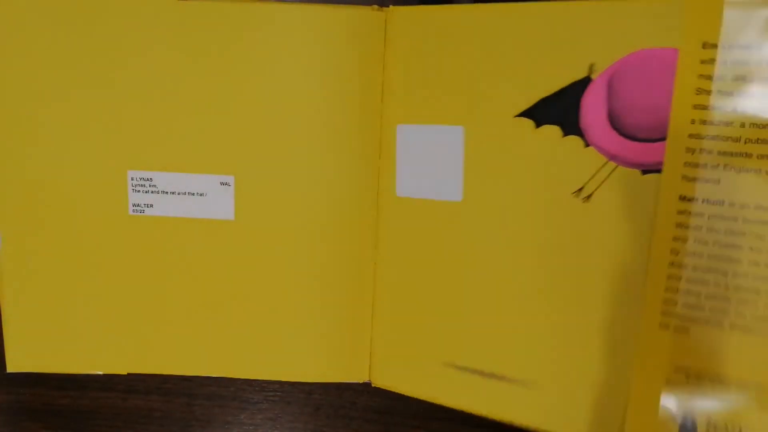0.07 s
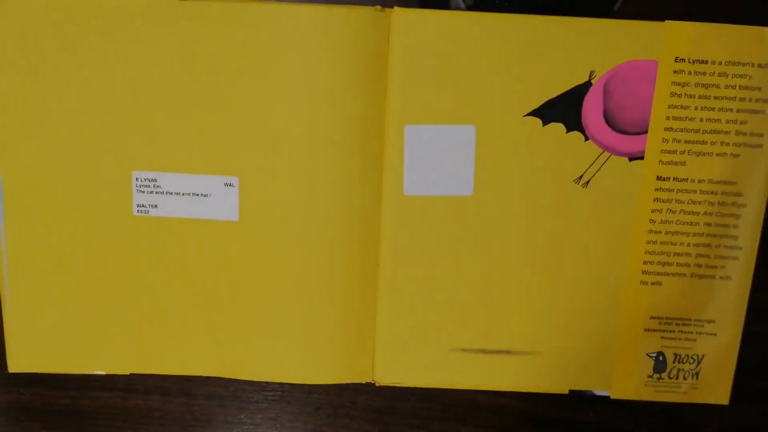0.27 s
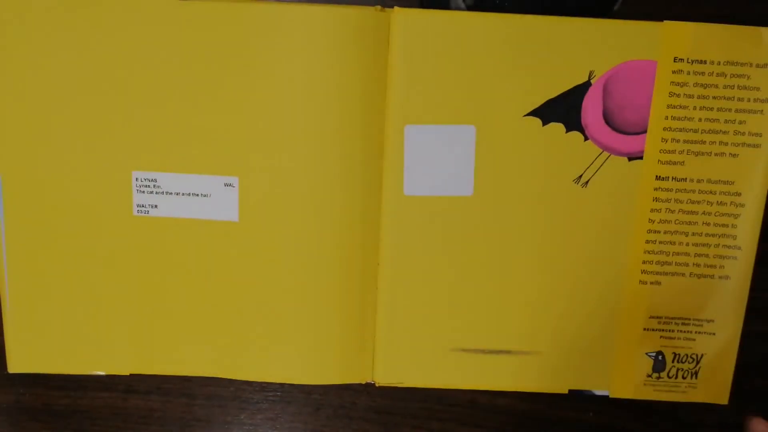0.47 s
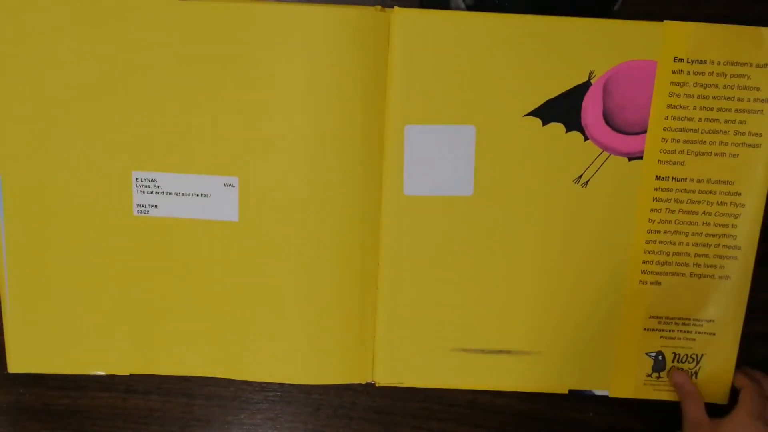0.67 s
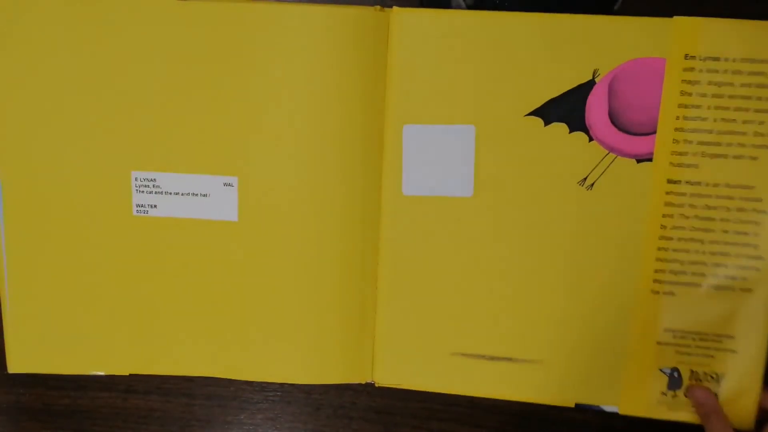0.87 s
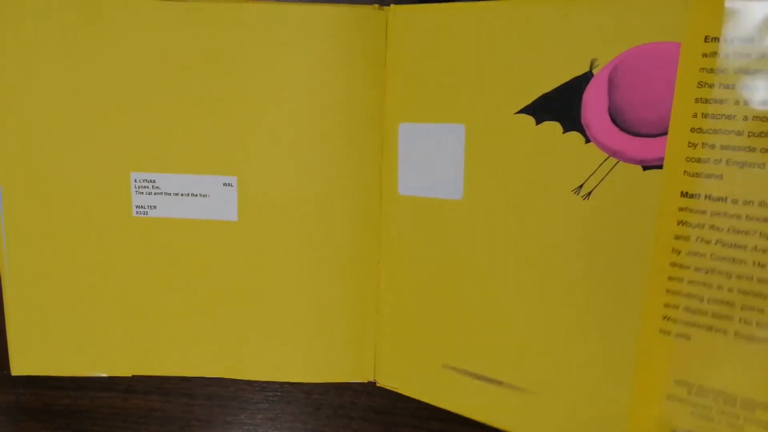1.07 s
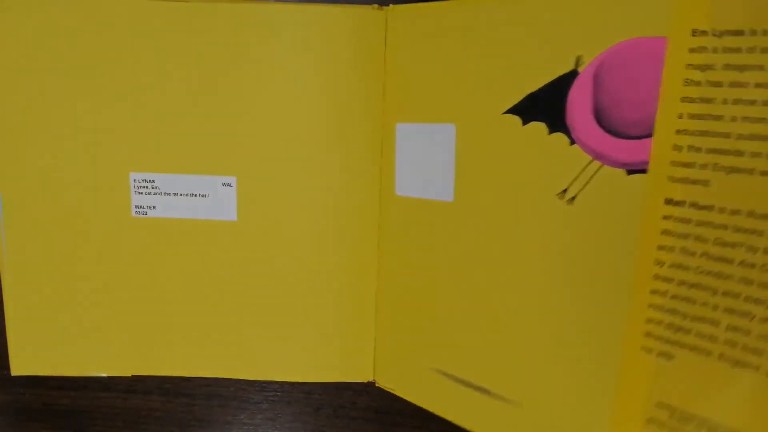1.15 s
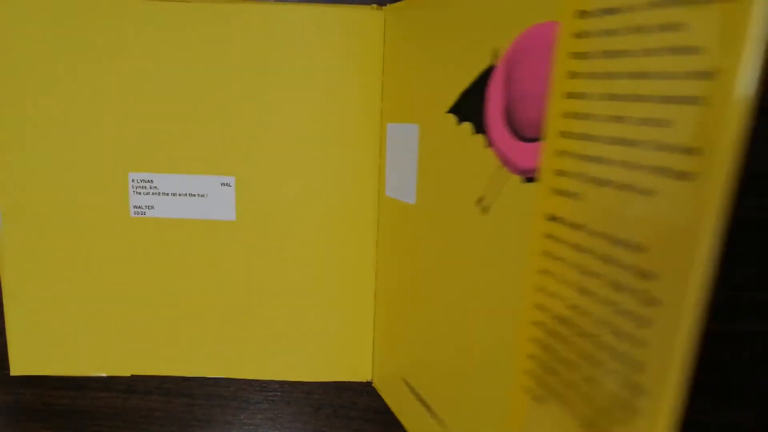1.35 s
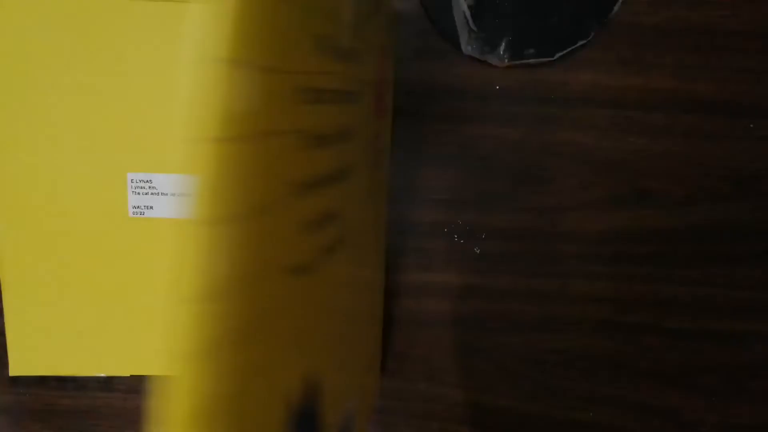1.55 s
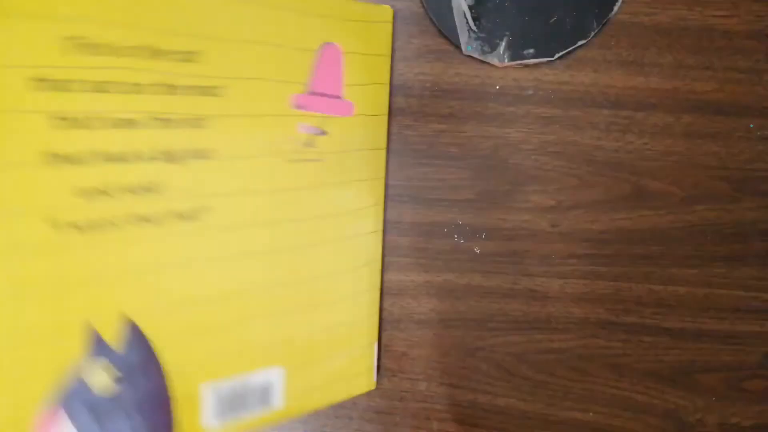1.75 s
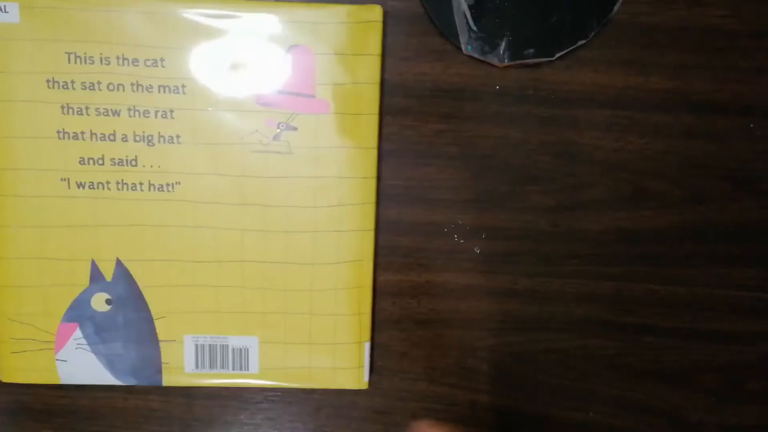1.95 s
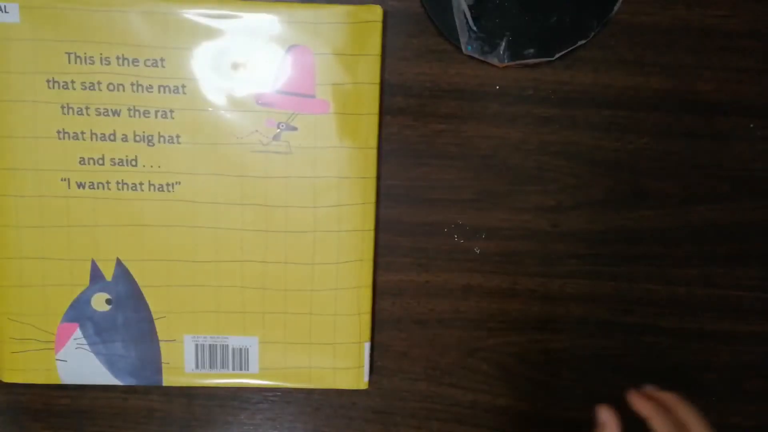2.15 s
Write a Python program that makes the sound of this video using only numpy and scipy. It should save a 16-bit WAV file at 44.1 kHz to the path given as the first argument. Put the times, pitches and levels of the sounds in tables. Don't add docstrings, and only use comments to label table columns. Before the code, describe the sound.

Hardcover book drops open on a wooden table, crackles in its plastic jacket, then thumps shut

```python
import sys
import numpy as np
from scipy import signal
from scipy.fft import rfft, irfft
from scipy.io import wavfile
from scipy.ndimage import uniform_filter1d

SR = 44100
rng = np.random.default_rng(int(sys.argv[2]) if len(sys.argv) > 2 else 0)


def materialize(psi):
    bounded = np.clip(np.atleast_2d(psi).T, -1, 1)
    quanta = np.round(bounded * 32767).astype(np.int16)
    wavfile.write(sys.argv[1], SR, quanta)


def boost_factor(decibels):
    exponent = np.asarray(decibels, float) / 20
    return 10 ** exponent


N = 97020


def evened(x):
    return x / np.sqrt(np.mean(x ** 2) + 1e-20)


def read(points, hz):
    f, value = np.transpose(points)
    return np.interp(np.log(hz + 1), np.log(f + 1), value)


def curve(points):
    return np.interp(np.arange(N) / SR, *np.transpose(points))


def add(mix, start_s, sound):
    part = mix[round(start_s * SR):][:len(sound)]
    part += sound[:len(part)]


def resonate(x, hz, width_hz):
    r = np.exp(-np.pi * width_hz / SR)
    feedback = [1, -2 * r * np.cos(2 * np.pi * hz / SR), r * r]
    return signal.lfilter([(1 - r * r) / 2, 0, (r * r - 1) / 2], feedback, x)


def band(x, lo_hz, hi_hz):
    return signal.sosfilt(signal.butter(2, [lo_hz, hi_hz], "band", fs=SR, output="sos"), x)


def burst(noise, length_ms, rise_ms):
    t_ms = np.arange(len(noise)) * 1e3 / SR
    fall = boost_factor(-20 * (t_ms / np.clip(length_ms, .3, 80)) ** 1.4)
    return noise * np.minimum(t_ms / rise_ms, 1) * fall


# pitch_hz, level_db (per Hz)
HUSH_COLOUR = [(12, -25), (20, -1.5), (113, -15.5), (172, -21), (434, -27.5), (660, -26), (738, -29.5),
               (3070, -44), (16000, -55.5)]
# time_s, level_db
RUMBLE_LEVEL = [(0, -62.5), (.45, -73.5), (.7, -65.5), (1.0, -70.5), (1.1, -75), (1.8, -72), (1.95, -58),
                (2.2, -73.5)]
# pitch_hz, likeness (0 to 1)
LIKENESS = [(30, 0.42), (300, 0.1), (1000, 0.23), (4000, 0.27), (12000, 0.23)]


def room_floor():
    hush_db, rumble_hz = -63, 51
    hz = np.fft.rfftfreq(N, 1 / SR)
    a, b, c = rfft(rng.standard_normal((3, N)))
    same = np.clip(read(LIKENESS, hz), 0, 1)
    both = np.array([a, same * a + np.sqrt(1 - same ** 2) * b])
    hush = irfft(both * boost_factor(read(HUSH_COLOUR, hz)), N)
    hump = (hz / rumble_hz) ** 2 / (1 + (hz / rumble_hz) ** 4.23)
    rumble = irfft(np.array([c + 0.17 * b, c - .25 * b]) * hump, N)
    rumble = boost_factor(curve(RUMBLE_LEVEL)) * evened(rumble) * boost_factor([[.5], [-.5]])
    return boost_factor(hush_db - 7) * evened(hush) + rumble


# time_s, level_db
RUB_LEVEL = [(0, -50.5), (.06, -87.5), (.18, -64), (.3, -53.5), (.45, -60), (.6, -87), (.72, -79),
             (.76, -66.5), (.9, -61), (1.0, -68.5), (1.15, -69.5), (1.25, -75.5), (1.32, -70), (1.6, -75.5),
             (1.8, -71.5), (1.865, -57), (1.89, -50), (2.2, -86)]
# pitch_hz, level_db
PAPER_COLOUR = [(300, -0.5), (700, 7), (1500, 2), (3000, 2.5), (6000, 1.5), (11000, -3.5), (16000, -2.5)]


def rubbing():
    slips_per_s, spread_db = 1200, 3.2
    strength = boost_factor(spread_db * np.minimum(rng.exponential(1, N), 4.5))
    slips = strength * (rng.random(N) < slips_per_s / SR)
    grains = signal.lfilter([1], [1, -.93], slips) * rng.standard_normal(N)
    tone = boost_factor(read(PAPER_COLOUR, np.fft.rfftfreq(N, 1 / SR)))
    return boost_factor(curve(RUB_LEVEL)) * evened(irfft(rfft(grains) * tone, N))


# start_s, peak_db, dull_part_db (relative), length_ms, sharp_top_db (relative)
JACKET_SNAPS = [(0.0173, -38, -14, 5.9, -14), (0.0632, -26, -63, 4.4, 4), (.161, -38.5, -37, 3.7, -14),
                (.189, -37, -9, 6.8, -1), (0.2019, -26.5, -16.5, 7.4, -13.5), (.208, -43.5, -8, 72, 11.5),
                (0.3261, -34, -9.5, 14, 6.5), (0.4224, -31, -12, 7, -21.5), (0.706, -54, -22, 6.2, -13),
                (0.7336, -29.5, -25, 3.5, -2.5), (0.7387, -26, -44, 11.6, -13.5),
                (0.744, -29, -48, 0.37, -12.5), (0.7486, -40.5, -19, 7.8, -2.5),
                (0.7547, -36, -8.5, 7.7, -2), (0.7779, -22.5, -17.5, 0.8, 6.5),
                (0.8357, -32, -25.5, 9.9, -4.5), (0.8817, -33.5, -20.5, 3.1, 11.5), (0.9006, -56, 3, 16, 2),
                (0.9706, -46, -25, 9.3, -8), (1.008, -53, -32, 3.3, -5.5), (1.0345, -21, -24.5, 2.63, -1.5),
                (1.1302, -42, -12, 5.2, 1), (1.243, -41.5, -35, 1.9, -2.5), (1.284, -39.5, -24.5, 12.6, -9),
                (1.4105, -43.5, -18, 4.8, -3.5), (1.417, -54, -30.5, 6.9, -23),
                (1.4416, -24.5, -23.5, 4.8, 1), (1.4843, -39, -12, 5.2, -15),
                (1.5532, -59, -0.5, 3.3, -0.5), (1.5842, -46.5, -1.5, 9.5, 10.5),
                (1.595, -50.5, -8, 5.3, 9.5), (1.6706, -51, -17, 4.9, -12), (1.7201, -59, -3.5, 6.3, -12),
                (1.7428, -65, -0.5, 18, -5), (1.8134, -72, 4, 11, -2), (1.8331, -27.5, -23.5, 3.6, 4.5),
                (1.8432, -32, -39, 12, 0.5)]


def jacket_snaps():
    split_hz, sharp_hz, dull_hz = 4300, 9800, 1600
    lift_hz, lift_width_hz, lift_db = 2700, 1100, .5
    bright, sharp, dull = np.zeros((3, N))
    noise = rng.standard_normal((len(JACKET_SNAPS), 2, 2000))
    noise[:, :, 14] = 2.05
    for (start_s, db, dull_db, ms, sharp_db), (a, b) in zip(JACKET_SNAPS, noise):
        add(bright, start_s, boost_factor(db - 3.5) * burst(a, ms, rise_ms=0.33))
        add(sharp, start_s, boost_factor(db - 2.5 + sharp_db) * burst(a, 0.62 * ms, rise_ms=0.13))
        add(dull, start_s, boost_factor(db + dull_db + 7) * burst(b, ms, rise_ms=.35))
    bright = band(band(bright, split_hz, sharp_hz), split_hz, 13000)
    sharp = band(band(sharp, sharp_hz, 19000), 8000, 19000)
    lift = boost_factor(lift_db) * resonate(dull, lift_hz, lift_width_hz)
    return bright + sharp, band(dull, dull_hz, split_hz) * 0.57 + lift


# start_s, peak_db, pitch_hz,
# fade_60db_s
KNOCKS = [(0.126, -61.5, 1120, 0.1), (0.187, -54, 840, 0.066), (0.3, -45.5, 301, 0.16),
          (.323, -48.5, 1020, 0.066), (0.42, -46.5, 676, 0.064), (0.7, -60, 290, 0.021),
          (0.705, -50, 319, 0.084), (0.746, -54, 646, 0.099), (0.845, -56, 729, 0.12),
          (0.859, -50.5, 745, 0.13), (0.874, -51.5, 723, 0.14), (1.0644, -44.5, 1046, 0.036),
          (1.126, -49, 1136, 0.035), (1.4431, -56, 990, 0.024), (1.607, -62.5, 940, 0.025),
          (1.55, -58, 1750, 0.05), (1.585, -63, 1020, 0.032), (1.719, -53.5, 1000, 0.032),
          (1.81, -59.5, 574, 0.083),
          (0.213, -46, 724, 0.1), (0.2285, -21.5, 960, 0.018), (0.699, -50, 124, 0.088),
                (0.744, -59, 171, 0.29), (1.0647, -44.5, 2046, 0.028), (.229, -27.5, 593, 0.054),
                (.258, -40.5, 637, 0.047), (.272, -41.5, 527, 0.053), (.856, -49, 994, .05),
                (0.754, -56, 1020, .05), (.882, -42.5, 1800, 0.019), (.95, -64, 670, 0.12),
                (1.878, -38.5, 1080, 0.044), (1.887, -30, 242, 0.057), (0.232, -38, 252, 0.19),
                (0.241, -49, 135, 0.36), (0.899, -48, 1800, 0.021)]


def knocks():
    out, t = np.zeros(N), np.arange(9000) / SR
    rows = KNOCKS
    noise = rng.standard_normal((len(rows), 9000))
    for (start_s, db, hz, fade_s), a in zip(rows, noise):
        rough = 0.95 * evened(resonate(a, hz, 0.36 * hz))
        ring = np.sin(2 * np.pi * hz * t) + rough
        add(out, start_s, boost_factor(db - 3.0 - 60 * t / fade_s) * np.minimum(t / 0.00044, 1) * ring)
    return out


# damping (per half swing), rise (half swings), lowest_hz
TABLE_GIVE = [
    (.33, 1.6, 220),
    (1.5, .45, 50),
]


def blow(contacts, modes, ring_db, damping, rise, low_hz):
    thud, slap, ring = np.zeros((3, N))
    t = np.arange(22000) / SR
    body = sum(boost_factor(db - 60 * t / fade_s) * np.sin(2 * np.pi * hz * t) for hz, db, fade_s in modes)
    noise = rng.standard_normal((len(contacts), 6000))
    for (start_s, thud_db, thud_ms, slap_db, slap_ms), a in zip(contacts, noise):
        swings = t[:900] * 1e3 / thud_ms
        push = np.sin(np.pi * swings) * np.exp(-damping * swings)
        add(thud, start_s, -boost_factor(thud_db - 5) * push * np.minimum(swings / rise, 1) ** 2)
        add(slap, start_s, boost_factor(slap_db) * burst(a, slap_ms, rise_ms=0.4))
        add(ring, start_s, boost_factor(thud_db + 11 + ring_db) * np.minimum(t / .003, 1) * body)
    return band(thud, low_hz, 9000) + band(slap, 600, 21000), -ring


# start_s, thud_db, thud_ms, slap_db, slap_ms
DROP_CONTACTS = [
    (.226, -27, 0.72, -40, 4),
    (.2285, -13.5, 0.78, -32.5, 33),
    (.2325, -30, 0.49, -21.5, 11.5),
    (.238, -22, 1.02, -29, 8.2),
    (.2455, -24, 1.18, -35, 14),
]
# pitch_hz, level_db, fade_60db_s
DROP_TONES = [(335.7, 0.5, 0.17), (497, -6, 0.31), (534.6, 3.5, 0.076), (931, -14, 0.29),
              (1080, -12.5, 0.435), (1378, -25, 0.15), (1440, -52, 1.7)]


def book_drops():
    return blow(DROP_CONTACTS, DROP_TONES, -39.5, *TABLE_GIVE[0])


# start_s, thud_db, thud_ms, slap_db, slap_ms
SHUT_CONTACTS = [
    (1.8735, -23.5, 0.6, -43, 9),
    (1.8775, -23, 0.55, -30.5, 17.8),
    (1.8846, -14.5, 1.36, -35, 3.3),
    (1.8862, -21, 1.44, -27.5, 4.2),
]
# pitch_hz, level_db, fade_60db_s
SHUT_TONES = [(42, -7, 1), (135, 6, 0.35), (222, 5, 0.33), (731, -22.5, 0.47), (698, 9.5, 0.042),
              (162, 12.5, 0.074), (327, -11.5, 0.46), (527.5, -12, 0.24), (824, 9.5, 0.041),
              (1053, -14, 0.04)]


def book_shuts():
    return blow(SHUT_CONTACTS, SHUT_TONES, -40, *TABLE_GIVE[1])


# time_s, left_minus_right_db
BOOK_SIDE = [(0, 2.5), (.5, 8), (1.1, -2), (1.6, -1.2), (1.85, -1), (2.2, 3.5)]
# from_s, to_s, late_ms
RIGHT_LATE = [
    (0, .5, .14),
    (.5, 1.2, .34),
    (1.2, 1.86, -.37),
    (1.86, 2.3, -.31),
]


def placed(book):
    near_hz, bass_lag = 1300, .5
    hz, t = np.fft.rfftfreq(N, 1 / SR), np.arange(N) / SR
    side = boost_factor(curve(BOOK_SIDE) / 2)
    low = irfft(rfft(book) / (1 + (hz / near_hz) ** 2), N)
    left, right = low + (book - low) * side, low + (book - low) / side
    bend = hz * (bass_lag + (1 - bass_lag) / (1 + (near_hz * 1.4 / (hz + 1)) ** 4))
    late = 0
    for from_s, to_s, ms in RIGHT_LATE:
        part = right * (t >= from_s) * (t < to_s)
        late = late + rfft(part) * np.exp(-2j * np.pi * bend * ms / 1e3)
    return np.array([left, irfft(late, N)])


# pitch_hz, fade_60db_s
ROOM_FADE = [(100, 0.093), (400, 0.18), (1500, 0.32), (5000, 0.37), (12000, 0.24)]


def room(x):
    room_db, early_db, turn_s = -5.5, 4, .45
    out, half_s = np.zeros((2, N)), SR // 2
    turn = np.arange(N) / SR / turn_s * np.pi
    for k in range(3):
        taps = np.zeros((2, half_s))
        at = np.arange(300, half_s - 20, 20) + rng.integers(0, 20, (2, (half_s - 301) // 20))
        np.put_along_axis(taps, at, rng.choice([-1., 1.], at.shape), 1)
        taps[:, rng.integers(60, 700, 6)] += boost_factor(early_db) * rng.uniform(-1, 1, (2, 6))
        hz, t, (a, b) = signal.stft(taps, SR, nperseg=256)
        same = np.clip(read(LIKENESS, hz), 0, 1)[:, None]
        both = np.array([a, same * a + np.sqrt(1 - same ** 2) * b])
        fade = boost_factor(-60 * t / read(ROOM_FADE, hz)[:, None])
        tail = signal.istft(both * fade, SR, nperseg=256)[1][:, :half_s]
        tail = boost_factor(room_db) * tail / np.linalg.norm(tail[0])
        window = np.sqrt(2 / 3) * np.cos(turn + k * np.pi / 3)
        out += signal.fftconvolve((x * window)[None], tail, axes=1)[:, :N]
    return out


RING_SIDE = [
    -3.5,
    3.5,
]


def scene():
    knock_wet_db, room_low_hz = -4, 340
    hush, rub = room_floor(), rubbing()
    bright, dull = jacket_snaps()
    taps = knocks() + dull
    drop, drop_ring = book_drops()
    shut, shut_ring = book_shuts()
    book = bright + taps + drop + shut + rub
    sent = book - (1 - boost_factor(knock_wet_db)) * taps
    rings = sum(boost_factor([[db / 2], [-db / 2]]) * ring for db, ring in zip(RING_SIDE, (drop_ring, shut_ring)))
    return placed(book) + room(band(sent, room_low_hz, 19000)) + rings + hush


# pitch_hz, level_db
PORT_COLOURS = [
    [(3100, 4), (4000, 0), (5200, 6.5), (6250, 12.5), (7000, 7.5), (8600, -10.5), (13300, -6), (14700, -6)],
    [(3100, 3), (4000, -4), (6000, -1.5), (7600, -0.5), (8800, 6.5), (10500, -1.5), (12500, -13.5),
     (15000, -39.5)],
]


def port(x, colour):
    edge_hz, edge_db = 15650, -20
    hz = abs(np.fft.fftfreq(2048, 1 / SR))
    db = uniform_filter1d(read(colour, hz) + edge_db * (hz > edge_hz), size=15, mode="wrap")
    taps = np.fft.ifft(np.exp(np.conj(signal.hilbert(np.log(boost_factor(db)))))).real
    return signal.oaconvolve(x, taps[:1024])[:N]


def roll_off(x):
    return signal.sosfilt(signal.butter(12, 16650, fs=SR, output="sos"), x)


def record(dry):
    hiss_db, top_hz = -76, 16600
    hiss = boost_factor(hiss_db) * band(rng.standard_normal((2, N)), 2010, 15300)
    heard = np.array([port(x, colour) for x, colour in zip(dry, PORT_COLOURS)]) + hiss
    hz = np.fft.rfftfreq(N, 1 / SR)
    reach = (hz < top_hz) / (1 + (34 / (hz + 1)) ** 1.595)
    return roll_off(irfft(rfft(heard) * reach, N))


dry = scene()
out = record(dry)
materialize(out)
```